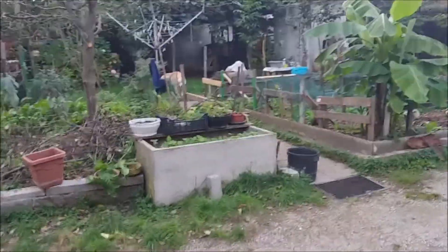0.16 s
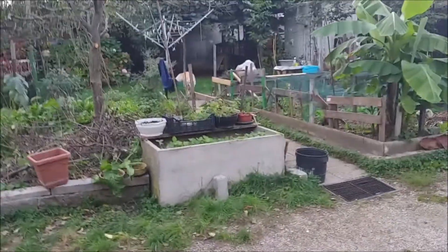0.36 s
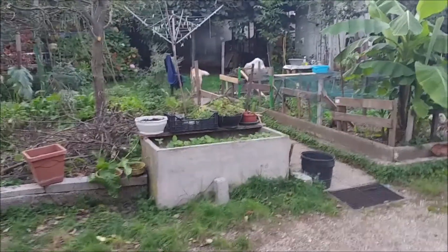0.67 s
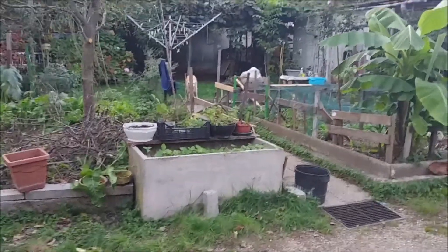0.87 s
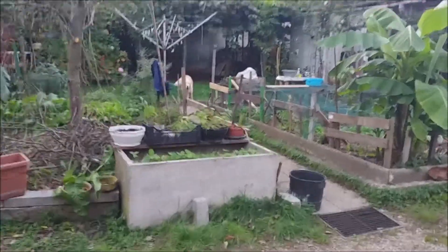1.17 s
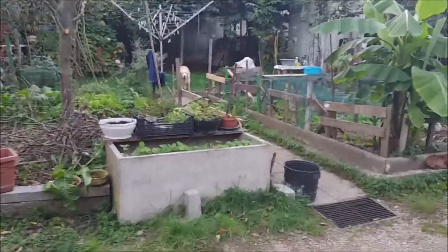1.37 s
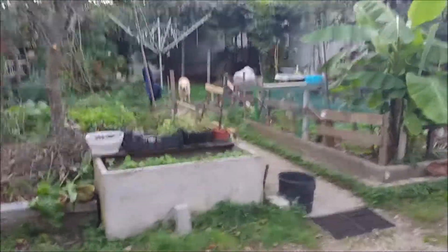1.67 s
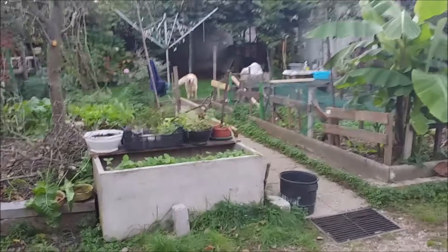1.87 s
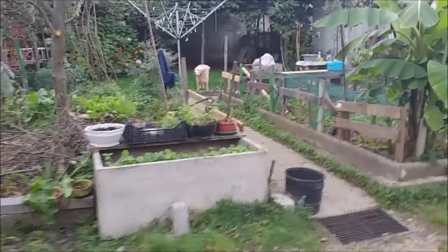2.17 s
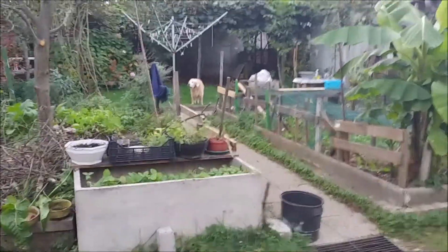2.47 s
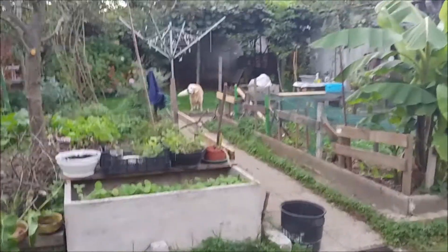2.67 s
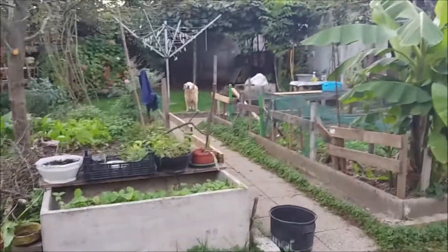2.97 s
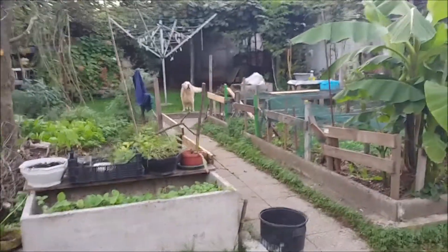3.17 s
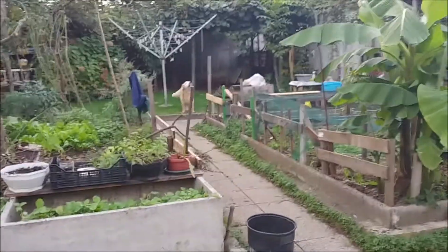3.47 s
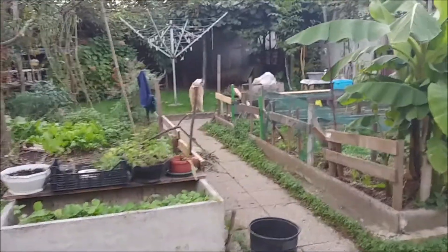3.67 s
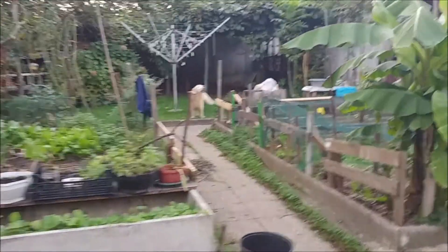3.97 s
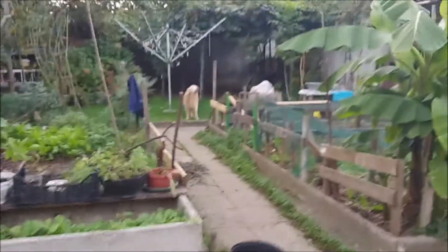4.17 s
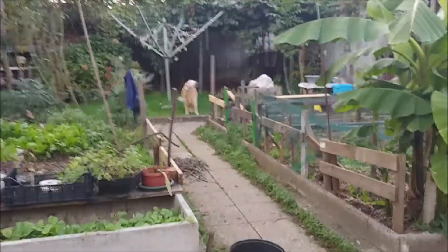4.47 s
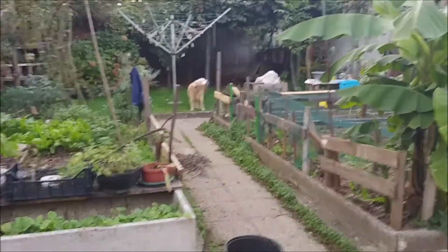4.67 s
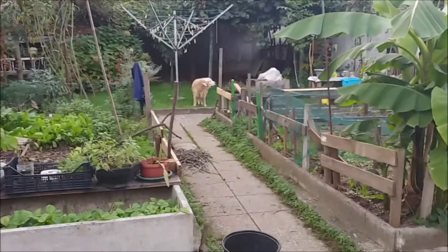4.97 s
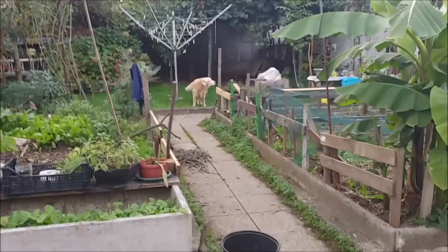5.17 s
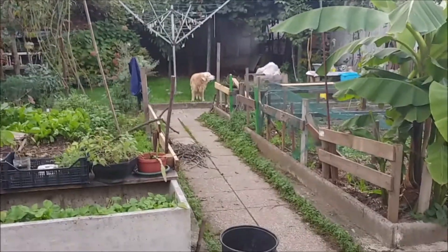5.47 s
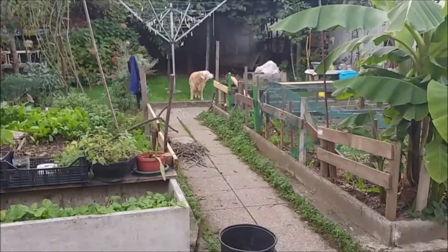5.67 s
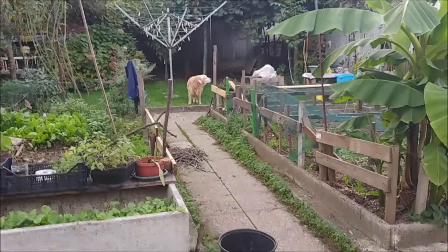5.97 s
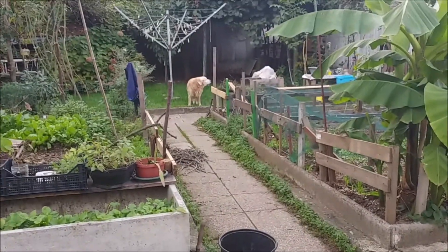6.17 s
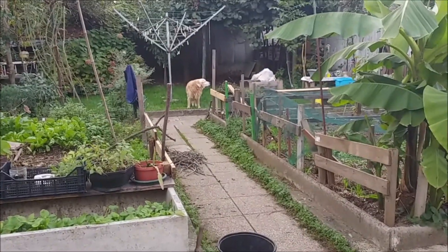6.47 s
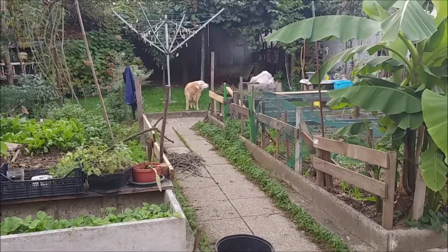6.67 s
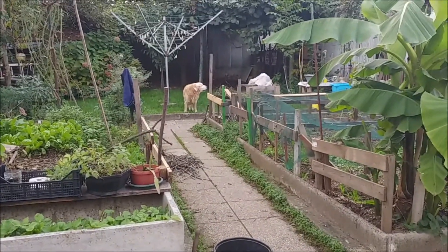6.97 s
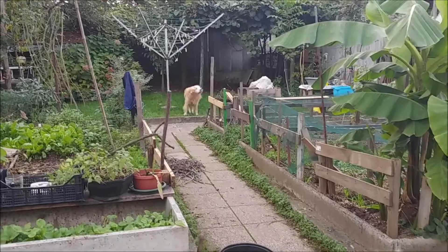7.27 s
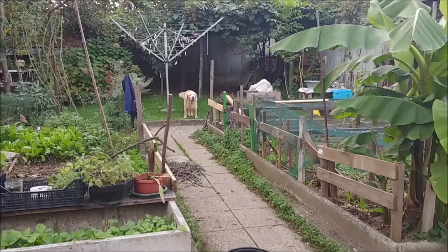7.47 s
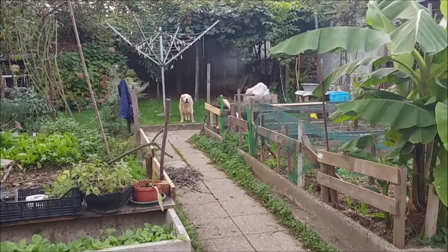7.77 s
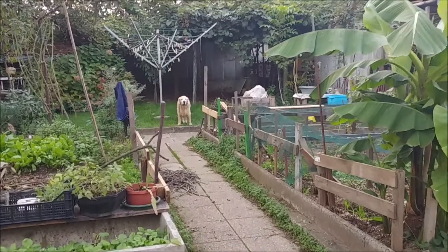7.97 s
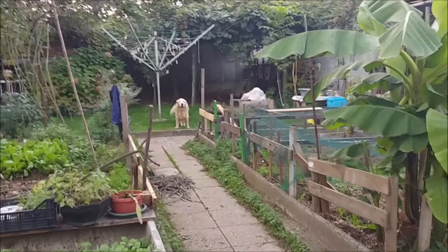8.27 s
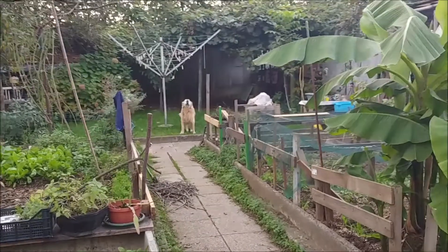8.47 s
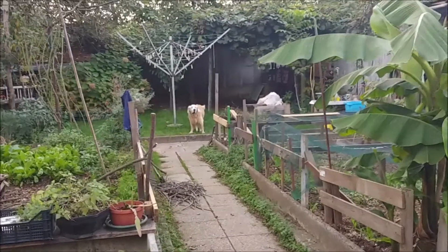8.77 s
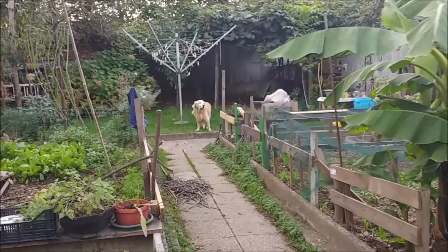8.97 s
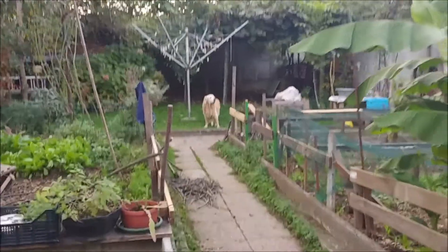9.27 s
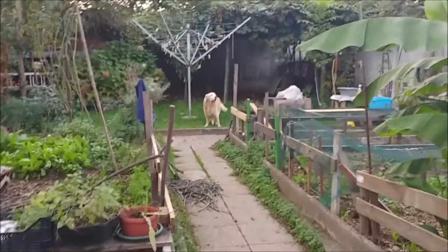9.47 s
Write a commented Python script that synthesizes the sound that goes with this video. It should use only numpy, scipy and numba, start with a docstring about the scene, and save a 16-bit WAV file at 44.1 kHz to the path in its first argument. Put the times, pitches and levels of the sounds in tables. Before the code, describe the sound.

A quiet walled back garden heard through a handheld stereo phone, with soft low town rumble and a barely audible high whine throughout. From 0.15 s slow footsteps knock dully, scuff and snap grit; a small hollow clatter falls at 0.8 s and a stronger one at 4.45 s, with a dull handling bump near 2.9 s. A distant engine hums up from about 1.1 s, fades after 4 s, and surges more weakly from 6.4 s to nearly 9 s. A large dog at the far end barks at about 1.9, 2.8, 3.5, 4.5, 7.1 and 8.4 s, the last the strongest. Each bark is short, around 0.15 s, rough and mid-pitched, arching up then sagging, with raspy breathy edges and quick wall echoes; several have a thin lead-in whine. Faint bird chips come at 1.5 s and between 5.9 and 9 s. Isolated grit clicks sound at 7.6 and after 9.1 s.

```python
"""Town air and a faint high whine hang over a walled back garden, as heard by someone walking slowly with a phone.
Soles knock, scuff and snap grit on the path from the first moment; hollow clatters come early and again midway.
A far engine, a few low exhaust notes, speeds up after about a second and again after six; a small bird chips.
From about two seconds a large dog at the far end barks six times: rough, arching tones through ringing airways.
The mouth resonance swells and fades as the jaw opens and shuts; walls and shrubs throw each bark back."""
import sys
import numpy as np
from scipy import signal
from scipy.fft import rfft, irfft, next_fast_len
from scipy.io import wavfile
from scipy.ndimage import uniform_filter1d
from numba import njit

SR = 44100
rng = np.random.default_rng(int(sys.argv[2]) if len(sys.argv) > 2 else 0)


def store_wav(level_fs):
    """Save 16-bit WAV to argv[1]."""
    pcm = np.round(np.clip(np.atleast_2d(level_fs), -1, 1) * 32767)
    wavfile.write(sys.argv[1], SR, pcm.T.astype(np.int16))


N = 423801
T = np.arange(N) / SR


def undb(db):
    """Decibels to gain."""
    return 10 ** (np.asarray(db) / 20)


def unit(x):
    """Scale to rms 1."""
    return x / np.sqrt(np.mean(x ** 2) + 1e-18)


def add(out, s, x):
    """Mix x into out from time s on."""
    i = max(int(s * SR), 0)
    n = min(x.shape[-1], N - i)
    out[..., i:i + n] += x[..., :n]


@njit
def resonate(x, hz, width_hz):
    """State-variable resonance with gain 1 at its centre, which may move every sample."""
    y, band, low = np.empty(len(x)), 0., 0.
    for i in range(len(x)):
        g, k = np.tan(np.pi * hz[i] / SR), width_hz / hz[i]
        v = (band + g * (x[i] + 1e-18 - low)) / (1 + g * (g + k))
        band, low, y[i] = 2 * v - band, low + 2 * g * v, k * v
    return y


def steep(x, hz, width_hz):
    """The same resonance twice, for dark valleys."""
    hz = hz * np.ones(len(x))
    return resonate(resonate(x, hz, float(width_hz)), hz, float(width_hz))


def filtered(x, order, hz, kind):
    """Butterworth filter along the last axis."""
    return signal.sosfilt(signal.butter(order, hz, kind, fs=SR, output="sos"), x)


def noise(points, size):
    """Noise with a spectrum of (Hz, dB per Hz) points."""
    hz, db = np.transpose(points)
    n = next_fast_len(size)
    f = np.maximum(np.arange(n // 2 + 1) * SR / n, 1)
    gain = undb(np.interp(np.log(f), np.log(hz), db)) * np.sqrt(SR / 2)
    return irfft(rfft(rng.standard_normal(n)) * gain, n)[:size]


def walk(rate, size):
    """Smooth chance of spread 1 that changes rate times a second."""
    k = max(int(SR / rate), 1)
    held = np.repeat(rng.standard_normal(size // k + 1), k)
    return unit(uniform_filter1d(uniform_filter1d(held, k), k)[:size])


def arch(length):
    """A smooth rise and fall, length s long."""
    return np.hanning(int(length * SR))


def tone(hz):
    """Sine whose pitch follows hz sample by sample."""
    return np.sin(2 * np.pi * np.cumsum(hz) / SR)


def high_whine(hz=10650, level_db=-79):
    """A very faint, wandering high whine."""
    pitch = hz + 170 * walk(2.4, N) + 120 * walk(900, N)
    return undb(level_db) * tone(pitch)


def throttle():
    """Firing rate and level of the engine: each pull is loud at once, gathers speed, then runs down to idle."""
    # Each row: start in s, run-up in s, time under load in s, top firing rate in Hz, level at the start in dB.
    pulls = [(1.15, 1.6, 3.2, 75.8, -29), (6.4, 1.7, 2.3, 82.46, -32.5)]
    idle_hz, idle_db = 56.8, -58
    throttle_s, load_sag_db_per_s, run_down_s = 0.28, -1, 1.0
    hz, db = np.zeros(N), np.zeros(N)
    for s, run_up, load, top_hz, top_db in pulls:
        hz += (top_hz - idle_hz) * np.interp(T - s, [0, run_up, load, load + run_down_s], [0, 1, 1, 0])
        lift_db = top_db - idle_db
        sagged_db = lift_db + load_sag_db_per_s * load
        # the level is back at idle before the speed is
        db += np.interp(T - s, [-throttle_s, 0, load, load + run_down_s / 2], [0, lift_db, sagged_db, 0])
    return idle_hz + hz, idle_db + db


def engine(second_db=-22, third_db=-28, waver_db=3):
    """Only the lowest exhaust notes carry this far, and they waver on the way."""
    hz, db = throttle()
    phase = 2 * np.pi * np.cumsum(hz * (1 + 0.0406 * walk(25, N))) / SR
    notes = np.zeros(N)
    for k, note_db in enumerate([0, second_db, third_db], 1):
        notes += undb(note_db + waver_db * walk(20, N)) * np.sin(k * phase)
    return notes * undb(db)


def town(road_db=-3.0, diffuse_db=-2.0, left_lag=20):
    """Road noise and engine from the right reach the left microphone left_lag samples late; other air is all round."""
    # Colour of town air before the two shares are set. Each row: frequency in Hz, level in dB per Hz.
    air_colour = [(25, -87), (40, -65), (55, -48.5), (80, -59), (120, -67.5), (330, -77), (550, -70.5),
                  (850, -74), (1300, -85.5), (2200, -92.5), (3300, -99), (7500, -107), (9500, -117),
                  (15000, -127)]
    road = noise(air_colour, N) * undb(road_db + .4 * walk(5, N)) + engine()
    around = np.array([noise(air_colour, N) for _ in range(2)])
    around = filtered(around, 1, 250, "high")
    return np.array([np.roll(road, left_lag), road]) + undb(diffuse_db) * around


def burst(decay, hz, width_hz, grind=0.3, spread=0.34):
    """A blow and its dying contact noise through a resonance, differing by ear; rms about 1 over the decay."""
    t = T[:SR // 10]
    shared, apart = rng.standard_normal(len(t)), rng.standard_normal((2, len(t)))
    push = grind * (shared + spread * apart) * np.exp(-t / decay)
    push[:, 0] += 1  # the blow itself
    return unit(np.array([steep(ear, hz, width_hz) for ear in push])) * np.sqrt(decay / t[-1])


def footsteps(snap_decay=0.00071, crunch_width=0.3, step_width_hz=380, grain_db=4, count=3):
    """Soles knock hollowly on the path, grind grit and snap small twigs; something clatters twice."""
    # Slow footfalls on the path. Each row: start in s, heel knock in dB, scuff length in s, scuff level in dB.
    footfalls = [(.152, -39, 0.091, -49), (.711, -41, 0.36, -45.5), (1.002, -38, 0.095, -51),
                 (1.552, -28, 0.13, -39), (1.715, -33, 0.085, -41.5), (2.299, -33, .24, -41.5),
                 (3.122, -38, .18, -43), (3.382, -39, 0.13, -40), (3.973, -35, 0.19, -45.5),
                 (4.478, -32, 0.11, -39.5)]
    # Relative colour of grit. Each row: frequency in Hz, level in dB.
    grit_colour = [(300, -17), (650, 15), (1400, 9), (2500, -5), (4500, -12), (7500, -9.5), (10000, -26),
                   (15500, -22)]
    # Hollow clatters of quick knocks. Each row: start in s, level of the last knock in dB, ring in Hz.
    clatters = [(.776, -26.5, 625), (4.447, -17, 606)]
    # The loudest twigs and stones underfoot. Each row: start in s, level in dB, ring in Hz, width in Hz.
    snaps = [(.42, -43.5, 3480, 1800), (.735, -42, 3040, 700), (0.803, -29, 1280, 790),
             (.849, -27.5, 1430, 880), (.919, -29.5, 1100, 890), (1.416, -41.5, 3280, 2500),
             (1.549, -33.5, 2370, 1200), (1.784, -40, 3170, 6000), (3.279, -36, 1840, 900),
             (3.403, -26.5, 1260, 696), (7.555, -28, 1410, 1490), (9.162, -29, 1270, 644),
             (9.389, -29, 1360, 690)]
    # A dull bump on the phone. Each row: start in s, level in dB, ring in Hz.
    bumps = [(2.872, -26.5, 123)]
    heel_hz, heel_decay_s, scuff_lead_s = 590, 0.0096, .04
    roll_s, crunch_db, crunch_hz = 0.081, 4.5, 2160  # crunch level is relative to the scuff
    clatter_gap_s, clatter_growth_db, clatter_decay_s = 0.01, 3.5, 0.0071
    out = np.zeros((2, N))
    for s, heel_db, length, scuff_db in footfalls:
        add(out, s, undb(heel_db) * burst(heel_decay_s, heel_hz, step_width_hz))
        shape = arch(length)
        grains = unit(undb(grain_db * walk(350, len(shape))))
        grit = np.array([unit(noise(grit_colour, len(shape))) for _ in range(2)])
        add(out, s - scuff_lead_s, undb(scuff_db) * shape * grains * grit)
        # after the heel the sole rolls on and crushes a few grains
        for when, size, pitch in rng.random((count, 3)):
            hz = crunch_hz * 2 ** (pitch - .5)
            crunch = burst(snap_decay, hz, crunch_width * hz)
            add(out, s + when * roll_s, size * undb(scuff_db + crunch_db) * crunch)
    for s, db, hz in clatters:
        for k in range(count):
            knock_db = db - (count - 1 - k) * clatter_growth_db
            add(out, s + k * clatter_gap_s, undb(knock_db) * burst(clatter_decay_s, hz, step_width_hz))
    for s, db, hz, width_hz in snaps:
        add(out, s, undb(db) * burst(snap_decay, hz, width_hz))
    for s, db, hz in bumps:
        add(out, s, undb(db) * burst(0.007, hz, step_width_hz))
    return out


def bird(length=0.031):
    """Short chips that arch up and down in pitch."""
    # Each row: start in s, top pitch in Hz before it wavers, level in dB before the garden.
    chips = [(1.463, 5400, -59), (5.875, 5370, -58), (6.425, 5270, -54.5), (7.54, 5020, -49),
             (8.594, 5300, -55), (9.01, 5270, -59)]
    out = np.zeros(N)
    shape = np.sqrt(arch(length))
    for s, hz, db in chips:
        pitch = hz * (.75 + .25 * shape + 0.031 * walk(900, len(shape)))
        add(out, s, undb(db) * shape * tone(pitch))
    return out


def scatter(t60, onset):
    """Stereo response of many small reflectors, energy 1; the microphones agree in the bass."""
    t = np.arange(SR) / SR
    mid, side = rng.standard_normal((2, SR))
    side = filtered(side, 1, 450, "high")
    response = np.array([mid + side, mid - side]) * undb(-60 * t / t60) * (1 - np.exp(-t / onset))
    return response / np.sqrt(np.sum(response ** 2) / 2)


def reflect(x, response):
    """Send one sound through a stereo response."""
    return signal.fftconvolve(np.atleast_2d(x), response, axes=1)[:, :N]


def yard(near, far, near_db=-14, far_db=-10, far_direct_db=-2):
    """Beds and fences put a short tail on near sounds, the trees a longer one on far sounds."""
    tails = undb(near_db) * reflect(near, scatter(0.062, .002))
    trees = undb(far_db) * reflect(far, scatter(.2, .002))
    return near + tails + undb(far_direct_db) * far + trees


def gesture(t, length, swell, fade_s, climb_s, top_hz, ring_at, ring_s):
    """Pitch and the dB shapes of effort, throat and mouth, t seconds into a bark."""
    # pitch climbs to its top, holds, then sags (drops as shares of the top pitch)
    hold_s, start_drop, end_drop = 0.0955, .29, 0.141
    climb = np.clip(1 - t / climb_s, 0, 1)
    sag = np.maximum(t - hold_s, 0) / (length - hold_s)
    hz = top_hz * (1 - start_drop * climb ** 1.5 - end_drop * sag ** 1.77)
    # effort swells, holds and is released
    effort_db = np.interp(t, [0, swell, max(length - fade_s, swell), length], [-16, 0, 0, -14])
    # the throat rings briefly above its resting level and partly follows the effort
    rest_db, effort_share = -11, 0.36
    ring = np.exp(-.5 * ((t - ring_at) / ring_s) ** 2)
    throat_db = effort_share * effort_db + rest_db * (1 - ring)
    # the jaw opens within a share of the swell, stays wide and shuts; the mouth resonance follows it
    open_share, shut_s = .6, 0.071
    mouth_db = np.interp(t, [0, open_share * swell, length - shut_s, length], [-12.5, 0, 0, -39])
    return hz, effort_db, throat_db, mouth_db


def teeth_rasp(hiss, shut, low_hz, high_hz, sway=0.0078, high_db=-1, low_db=-4.5, width_hz=420):
    """Air hissing past teeth and muzzle; the lips shift its resonances from bark to bark."""
    # Each row: resonance in Hz before the lips and jaw shift it, width in Hz, relative level in dB.
    teeth = [(3710, 230, -0.5), (4450, 610, -3.5), (5170, 540, -2.5), (6380, 600, 1.5), (7690, 210, -1),
             (10400, 960, -5.5), (11500, 1200, -7.5), (13800, 6100, -7.5)]
    shifts = 1 + 0.03 * rng.standard_normal(len(teeth))
    rasp = np.zeros(len(hiss))
    for (hz, width, db), shift in zip(teeth, shifts):
        moving_hz = hz * shift * (1 - 0.078 * shut + sway * walk(43, len(hiss)))
        rasp += undb(db) * unit(steep(hiss, moving_hz, width))
    high = undb(high_db) * unit(steep(hiss, high_hz, width_hz))
    low = undb(low_db) * unit(steep(hiss, low_hz, width_hz))
    return unit(rasp) + high + low


def bark(s, length, swell, fade_s, climb_s, top_hz, db, throat_db, ring_at, ring_s, mouth_db,
         rough_start, rough_end, rasp_db, rasp_low_hz, rasp_hz, muzzle_db,
         jitter=0.064, shimmer=0.53, half_share=1.0, turbulence=1.0, attack=0.003996, release=0.012,
         opening_s=0.062, shut_drop=0.41, shut_boost_db=25, parting_s=0.011):
    """Unevenly beating vocal folds and turbulent air ring the airway. Returns start time, then voice and rasp."""
    # Airway resonances with the jaw open. Each: frequency in Hz, width in Hz.
    chest_ring, throat_ring = (478.4, 163), (866, 167)
    mouth_ring, muzzle_ring = (1331, 162), (2530, 123)
    t = np.arange(-attack, length + release, 1 / SR)
    n = len(t)
    hz, effort_db, ring_db, jaw_db = gesture(t, length, swell, fade_s, climb_s, top_hz, ring_at, ring_s)
    effort = undb(db + effort_db) * np.interp(t, [t[0], attack, length, t[-1]], [0, 1, 1, 0])
    # throat and mouth are weighed against the fundamental
    throat_db, mouth_db = throat_db + ring_db - effort_db, mouth_db + jaw_db - effort_db

    rough = np.interp(t, [0, length], [rough_start, rough_end])
    phase = 2 * np.pi * np.cumsum(hz * (1 + jitter * rough * walk(420, n))) / SR
    folds = sum(np.cos(k * phase) for k in range(1, 8)) * np.sqrt(2)
    # strained folds beat strong-weak, which puts half lines between the harmonics
    strong_weak = half_share * walk(56.5, n) * np.cos(phase / 2)
    folds = folds * (1 + rough * (shimmer * walk(500, n) + strong_weak))
    puffs = 1 + np.cos(phase)
    air = rough * rng.standard_normal(n) * np.sqrt(SR / 2 / hz) * puffs
    source = folds * (1 - 0.37 * rough) + turbulence * air

    # the upper resonances start low and climb as the jaw drops
    shut = shut_drop * np.exp(-(t - t[0]) / opening_s)
    chest = unit(steep(folds + 0.79 * air, *chest_ring))
    throat = undb(throat_db) * unit(steep(source, *throat_ring))
    mouth = undb(mouth_db) * unit(steep(source, mouth_ring[0] * (1 - 0.31 * shut), mouth_ring[1]))
    muzzle = unit(steep(source + 0.35 * air, muzzle_ring[0] * (1 - shut), muzzle_ring[1]))
    muzzle = undb(muzzle_db + 0.82 * mouth_db + shut_boost_db * shut - 9.0) * muzzle
    # the overtones only get out once the lips have parted
    parted = 1 - np.exp(-((t - t[0]) / parting_s) ** 2)
    voice = effort * (chest + np.sqrt(parted) * (throat + mouth) + parted * muzzle)
    voice = filtered(voice, 9, [320, 2750], "band")

    rasp = teeth_rasp(rng.standard_normal(n) * puffs, shut, rasp_low_hz, rasp_hz)
    # the rasp peaks in mid-bark and is weaker before and after
    rasp_top_s, rasp_spread_s, rasp_edge_db = 0.049, 0.022, -8
    middle = np.exp(-.5 * ((t - rasp_top_s) / rasp_spread_s) ** 2)
    rasp = filtered(rasp * undb(rasp_edge_db * (1 - middle)), 8, 3750, "high")
    # an open mouth lets more of it out
    rasp = rasp * parted * effort * undb(rasp_db + 0.53 * mouth_db + 2.8)
    return s + t[0], np.array([voice, rasp])


def dog():
    """All barks and their rising lead-in whines: voice and rasp."""
    # Thin whines into a bark. Each row: start in s, length in s, middle pitch in Hz, level in dB.
    whines = [(1.87, 0.037, 552, -28), (3.468, 0.062, 505, -29.5), (7.114, 0.033, 537, -28.5),
              (8.35, 0.049, 567, -32.5)]
    # Each row: start in s, length in s, swell in s, release in s, pitch climb in s, top pitch in Hz before
    # jitter, level in dB, throat in dB, time of the strongest throat ring in s, its spread in s, mouth in dB,
    # roughness at start and end (0-1), rasp in dB, lower and upper rasp resonance in Hz, muzzle in dB.
    # Throat, mouth, rasp and muzzle levels are starting points that effort and jaw then move.
    barks = [(1.878, 0.16, 0.047, 0.083, .09, 465.4, -9, -5, 0.11, .027, -14.5, 0.72, 0.33, -23, 4620, 7050, -14),
             (2.822, 0.15, 0.021, 0.056, 0.065, 475, -8.5, -10, 0.07, 0.09, -12.5, 0.43, 0.47, -28.5, 4400, 7310, -18.5),
             (3.506, .16, 0.049, 0.044, 0.093, 465.6, -9.5, -2.5, 0.047, 0.03, -7, 0.43, 1, -25.5, 4240, 6320, -16),
             (4.508, .17, 0.037, 0.075, 0.079, 473.3, -8.5, -9, 0.055, 0.096, -12.5, .22, .8, -29, 4670, 6530, -22),
             (7.128, 0.15, 0.054, 0.068, .09, 457.3, -10.5, -4, 0.096, 0.035, -14.5, 0.8, 0.15, -23.5, 4330, 6980, -15.5),
             (8.389, 0.15, 0.089, 0.043, 0.062, 476.7, -6.5, -5.5, 0.058, .022, -12, 0.24, 0.2, -24, 5030, 7370, -13)]
    out = np.zeros((2, N))
    for s, length, hz, db in whines:
        shape = arch(length)
        glide = hz * (1 + 0.22 * np.linspace(-1, 1, len(shape)) + 0.083 * walk(385, len(shape)))
        add(out[0], s, undb(db) * np.sqrt(2) * shape * tone(glide))
    for row in barks:
        add(out, *bark(*row))
    return out


def garden(voice, rasp, shrubs_db=-11, houses_db=-26, rasp_scatter_db=-1, rasp_direct_db=-11):
    """Direct sound, wall echoes, a short scatter from shrubs and a faint long one from the houses."""
    # Echoes from the garden walls. Each row: delay in s, level in dB, lag of left behind right in s.
    echoes = [(.013, -10, .0003), (.031, -11.5, 0.012), (.058, -17, .0002), (.083, -18.5, -.0002),
              (.165, -32, .0001)]
    out = np.zeros((2, N)) + voice + undb(rasp_direct_db) * rasp
    for delay, db, lag in echoes:
        add(out[0], delay + lag, undb(db) * voice)
        add(out[1], delay, undb(db) * voice)
    tail = undb(shrubs_db) * scatter(0.52, 0.0024) + undb(houses_db) * scatter(1.57, 0.0067)
    out += reflect(voice, tail)
    return out + undb(rasp_scatter_db) * reflect(rasp, scatter(0.28, 0.00083))


def scene():
    """Surroundings, walker and bird, and the dog."""
    return high_whine() + town() + yard(footsteps(), bird()) + garden(*dog())


def record(dry, left_cut_hz=160, port_hz=9000, port_width_hz=3500, port_gain=0.61, top_hz=15700):
    """The left microphone is thin in the bass and its port rings in the treble; peaks are rounded, the top is cut."""
    left = filtered(dry[0], 1, left_cut_hz, "high")
    ports = np.array([left + port_gain * steep(left, port_hz, port_width_hz), dry[1]])
    rounded = ports / (1 + ports ** 8) ** (1 / 8)
    return signal.sosfilt(signal.ellip(8, .2, 70, top_hz, fs=SR, output="sos"), rounded)


dry = scene()
out = record(dry)
store_wav(out)
```